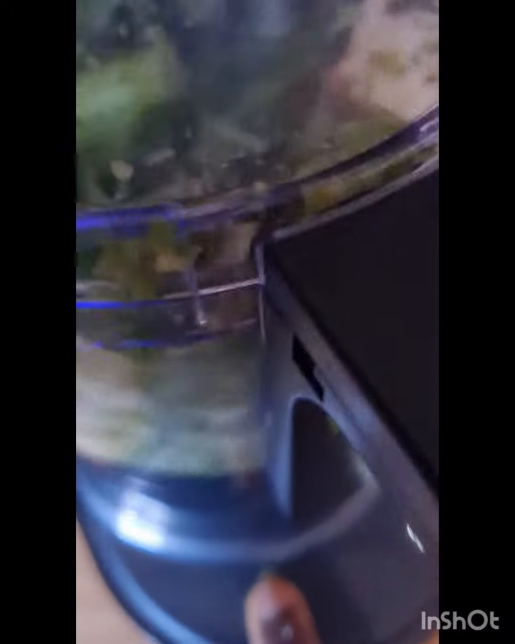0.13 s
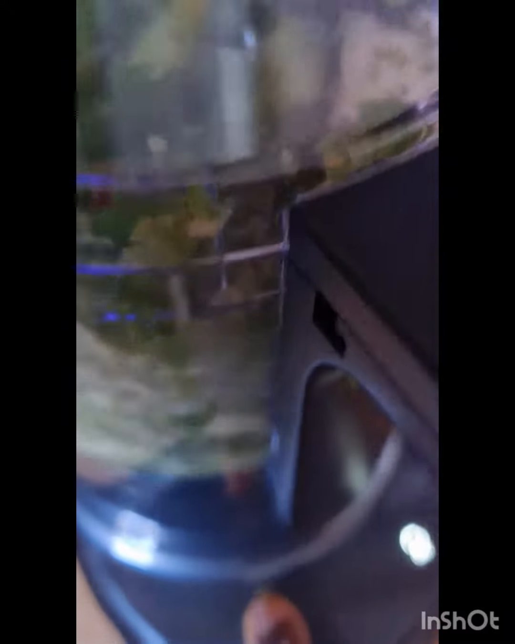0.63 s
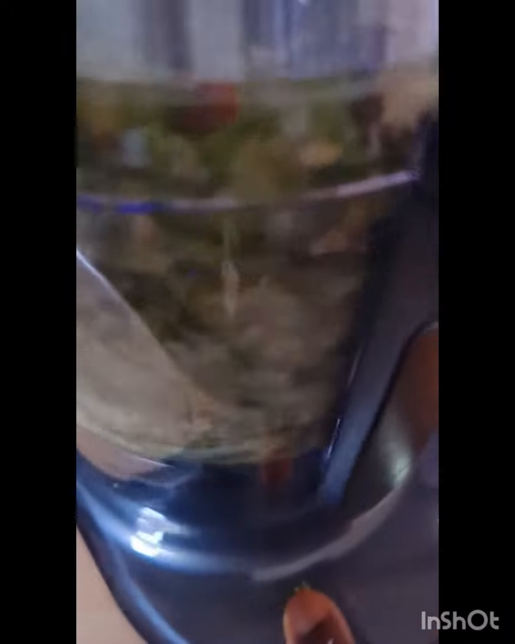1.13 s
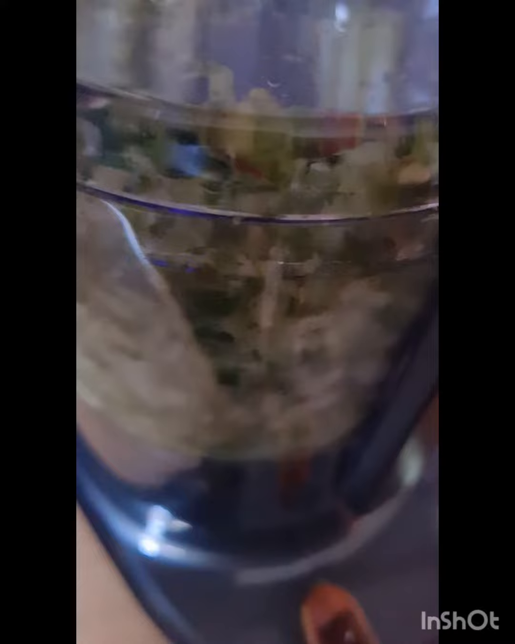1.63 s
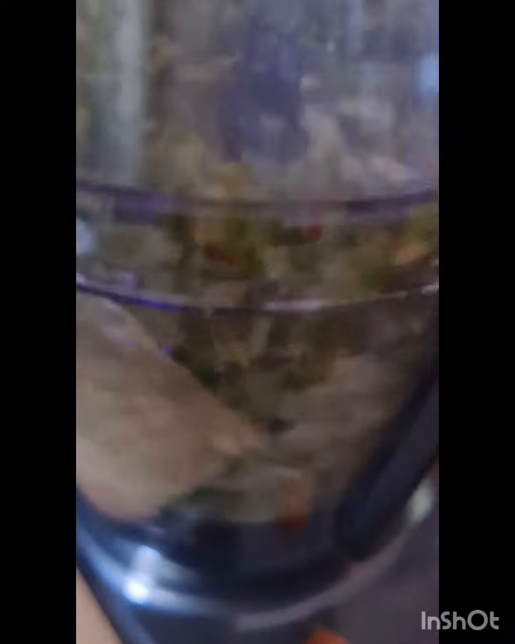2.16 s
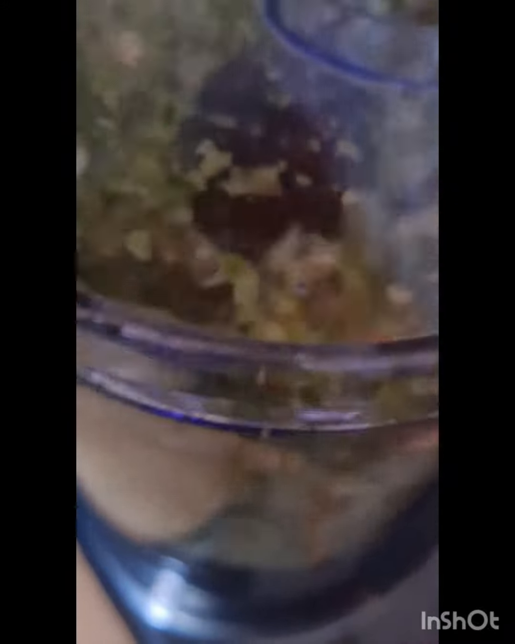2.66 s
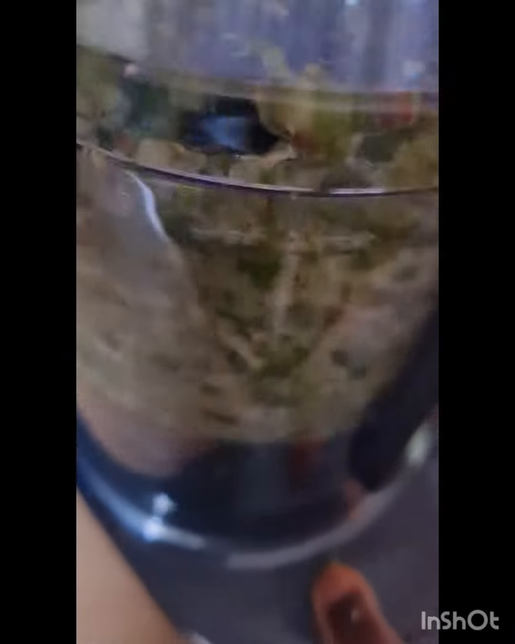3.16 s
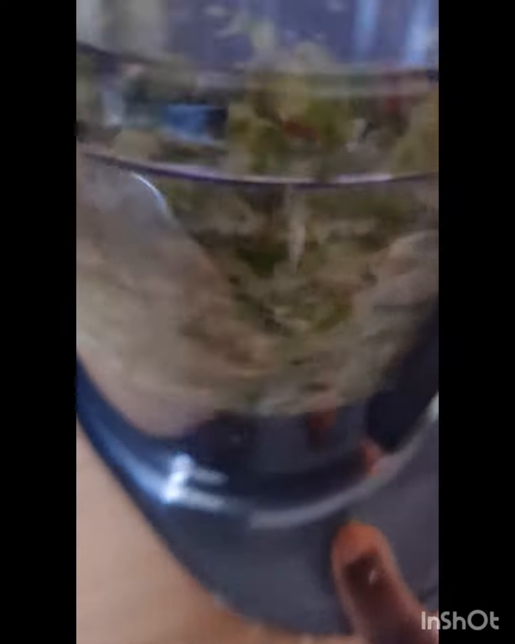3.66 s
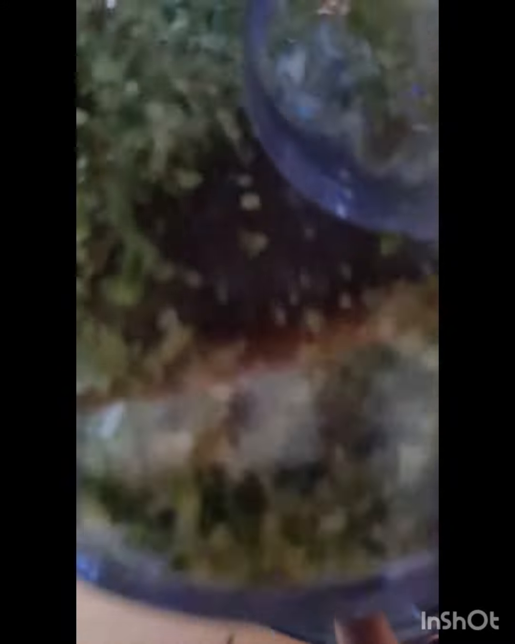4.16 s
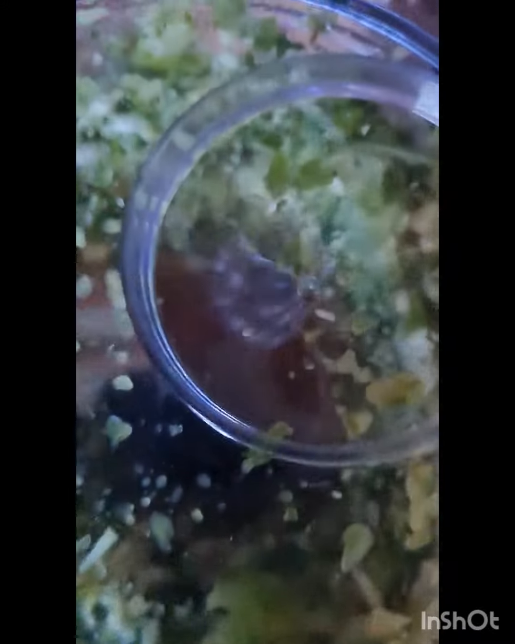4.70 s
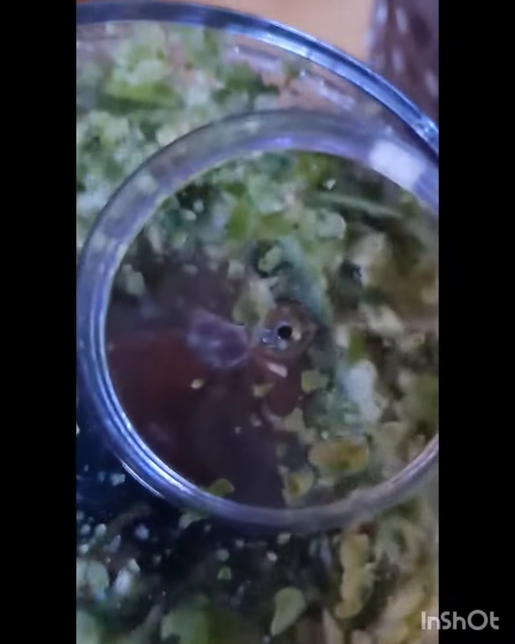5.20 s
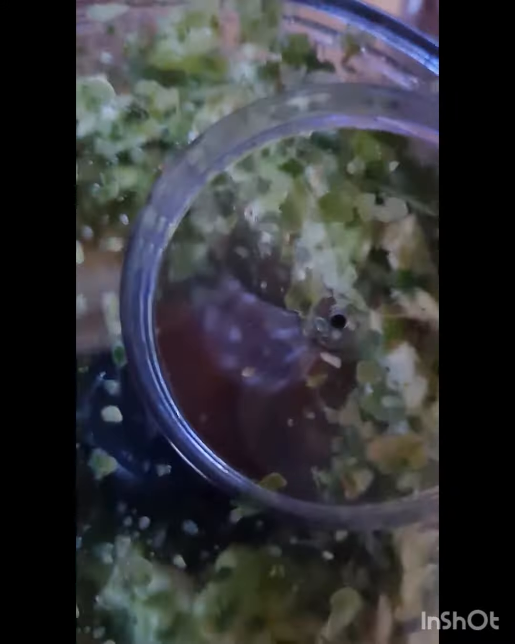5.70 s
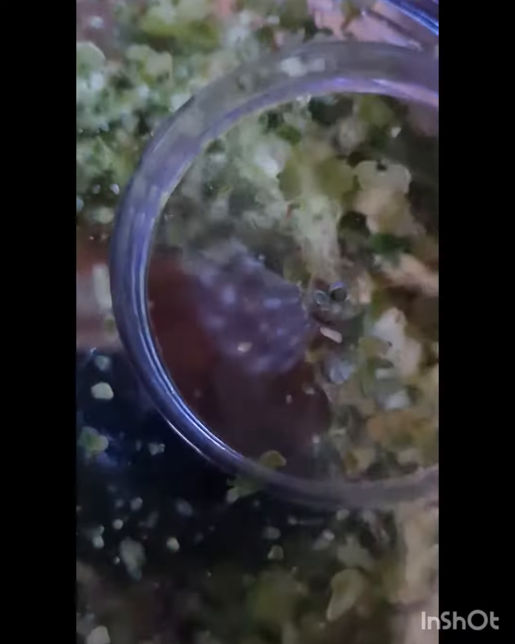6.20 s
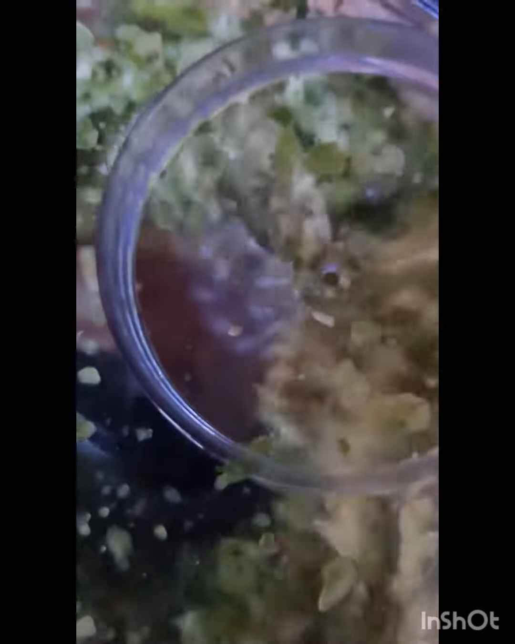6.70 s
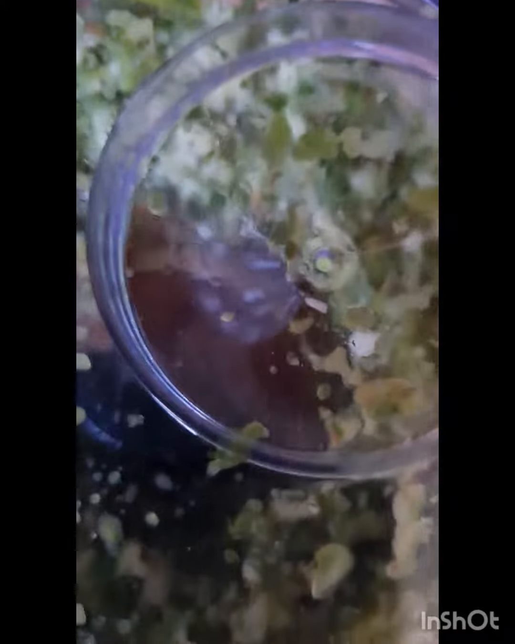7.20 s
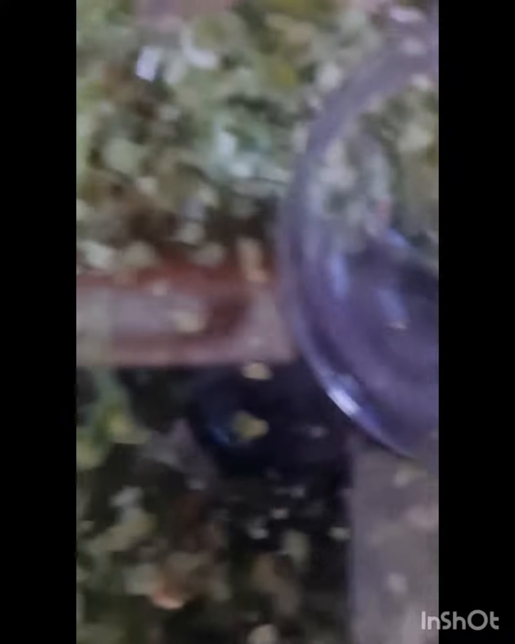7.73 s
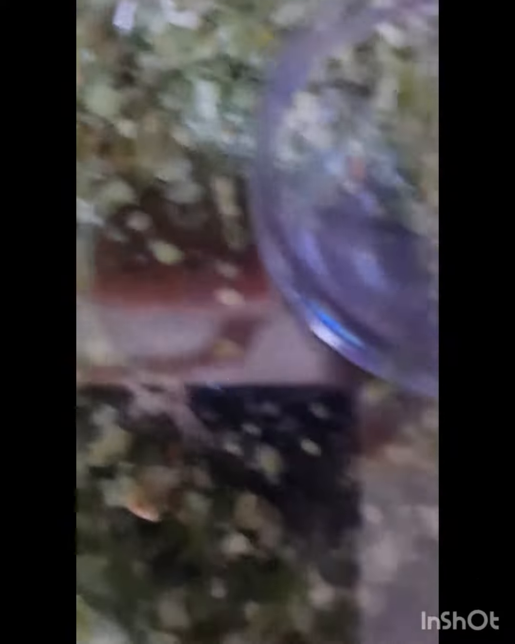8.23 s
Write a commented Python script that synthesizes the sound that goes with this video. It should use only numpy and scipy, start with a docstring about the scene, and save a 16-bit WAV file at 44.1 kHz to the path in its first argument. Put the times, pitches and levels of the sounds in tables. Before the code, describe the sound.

A food processor grinds wet vegetables very close by, with a piercing gliding whine over a dense, rough roar of air, rattle and blade chops. The pitch sags and recovers with the load, climbing higher later. The hand-held phone moves from beside the base to above the lid. The motor is switched off, drops quickly in pitch and stops, leaving a quiet kitchen with low fridge hum and tiny ticks.

```python
"""A food processor whines and roars as it grinds wet vegetables in a plastic bowl, then stops in a quiet kitchen.
Tooth, octave and fan tones follow a shaft speed that sags and recovers with the load.
Fan air, blade bites and a once-a-turn rattle ring the housing, throbbing at twice the mains frequency.
Hum, thuds and rumble swell below. The phone moves from beside the base to above the lid.
After switch-off the shaft spins down, leaving fridge hum, hiss, a bowl ring and two ticks."""
import sys
import numpy as np
from scipy import signal
from scipy.fft import rfft, irfft, next_fast_len
from scipy.io import wavfile
from scipy.ndimage import uniform_filter1d, map_coordinates

SR = 44100
rng = np.random.default_rng(int(sys.argv[2]) if len(sys.argv) > 2 else 0)


def waveform_to_disk(signal):
    """Save audio, clipped to [-1, 1], as 16-bit WAV at the path in sys.argv[1]."""
    frames = np.transpose(np.atleast_2d(signal))
    scaled = np.clip(frames, -1, 1) * 32767
    samples = np.round(scaled).astype(np.int16)
    wavfile.write(sys.argv[1], SR, samples)


def ratio_of_db(decibels):
    """Turn decibels (scalar or array-like) into linear amplitude factors; 0 dB maps to 1."""
    return 10 ** (np.asarray(decibels, float) / 20)


N = 368235
T = np.arange(N) / SR
SIZE = next_fast_len(N + SR)
HZ = np.maximum(np.fft.rfftfreq(SIZE, 1 / SR), 1)
SIDE = np.array([[.5], [-.5]])  # left, right share of a level difference in dB
TORQUE_HZ, RUMBLE_HZ = 100, 48.3
SWITCH_OFF_S = 6.93

# hand-held phone: time_s, height (0 beside the base - 1 above the lid)
PHONE_HEIGHT = [(0, 0.33), (2.4, 0.21), (3.5, 0.15), (4.4, 0.89), (8.35, 0.71)]


def processor():
    """Motor, bowl and housing driven by one shaft, heard from a moving place."""
    height, = curves(PHONE_HEIGHT)
    place = np.clip((height - .25) / .6, 0, 1)
    speed, coast = shaft_speed()
    turns, throb = torque_ripple(speed)
    pan_db = -6.5 + 0.54 * walk(4.9)
    tones = whine(speed, turns, coast, throb, pan_db, place)
    body = housing_roar(turns, coast, throb, pan_db, height, place)
    return tones + body + hum(coast, place) + rumble(coast, place) + thuds(coast, place)


# shaft, slowed by chunks under the blade, recovering, then coasting down: time_s, speed_turns_per_s
SHAFT_SPEED = [(0, 95), (0.12, 95), (0.28, 93.2), (0.4, 97.4), (0.62, 99.8), (0.7, 99.1), (0.8, 100.3),
               (0.9, 97.3), (1.0, 99.5), (1.18, 101), (1.32, 104.8), (1.58, 96.2), (1.7, 96.4), (1.8, 95.8),
               (1.92, 99.8), (2.1, 101.7), (2.24, 98.4), (2.64, 112.4), (2.75, 111), (2.9, 103.9),
               (3.0, 101.5), (3.12, 95), (3.22, 95.4), (3.4, 101.4), (3.6, 109.8), (3.75, 111.6),
               (4.04, 117.6), (4.14, 114.8), (4.27, 108), (4.4, 102.6), (4.53, 99.8), (4.72, 105.4),
               (4.94, 116), (5.1, 117.5), (5.2, 120.8), (5.32, 129.3), (5.42, 129.8), (5.6, 114.9),
               (5.81, 101.8), (6.0, 109), (6.35, 120.8), (6.55, 129), (6.66, 131), (6.72, 130.6),
               (6.78, 127), (6.85, 115.5), (6.88, 111.5), (6.93, 109.5), (6.96, 99.5), (7.0, 80),
               (7.045, 64), (7.085, 50), (7.2, 28), (7.26, 14), (7.29, 4.5), (7.34, 1.5), (7.41, .1)]


def shaft_speed():
    """Shaft speed smoothed by inertia, and log10 of its shortfall below the coasting speed."""
    inertia_s, coast_turns_per_s = .03, 97.6
    speed = uniform_filter1d(curves(SHAFT_SPEED)[0], int(inertia_s * SR))
    return speed, np.log10(np.minimum(speed / coast_turns_per_s, 1))


def torque_ripple(speed):
    """Torque peaks twice per mains cycle: the shaft runs ahead and behind, the sound throbs."""
    ripple_turns, peakedness = .0025, 1.3
    powered = T < SWITCH_OFF_S
    # load jerks blur the high partials most
    turns = np.cumsum(speed * (1 + .002 * walk(30))) / SR
    swing = np.sin(2 * np.pi * TORQUE_HZ * T + .5 * walk(3.04))
    turns += ripple_turns * swing * powered
    throb = np.exp(peakedness * swing)
    throb = unit(throb - throb.mean()) * np.sqrt(.5) * powered
    return turns, throb


# what the housing lets out as each tone glides, relative levels: pitch_hz, beside_db, above_db
TOOTH_LEVEL = [(1001, -50, -36), (1700, -40, -25), (1900, -38, -24), (2100, -26, -30), (2150, -19.5, -29),
               (2204, -16.5, -30.5), (2266, -23.5, -28), (2340, -24, -27), (2358, -30, -25),
               (2440, -34.5, -20), (2462, -26, -21), (2490, -40, -22.5), (2695, -36.5, -32),
               (2860, -40.5, -27.5), (2904, -43, -34.5), (3070, -40, -30)]
OCTAVE_LEVEL = [(900, -52, -46), (1500, -40, -30), (2100, -30, -24), (2910, -30, -25), (3500, -36.5, -35.5),
                (4000, -37, -25.5), (4365, -36.5, -40), (4393, -25.5, -35.5), (4550, -26, -34),
                (4504, -19, -35), (4500, -23.5, -30.5), (4900, -28, -33.5), (4880, -26, -32),
                (5170, -37, -38), (5400, -57, -31.5), (5780, -45, -41), (5980, -50.5, -48.5)]
FAN_LEVEL = [(1000, -52, -52), (1600, -42, -37.5), (2440, -36, -36), (2520, -29, -31.5),
             (2640, -34.5, -25.5), (2660, -33, -28.5), (2700, -36, -33), (2850, -34.5, -33.5),
             (2910, -35, -34.5), (3200, -37, -33.5), (3430, -41.5, -36.5)]
# left minus right of the tooth tone: pitch_hz, beside_db, above_db
TOOTH_LEAN = [(2120, -1, 6), (2160, -4, 1.5), (2280, -6, -12), (2340, -7.5, -18), (2380, 0, -13),
              (2520, -1, -11.5), (2650, -6.5, -15.5), (2705, -6.5, -6.5), (2920, 1, -8.5), (2950, 1, -20.5)]
# swells and dips: time_s, change_db, half_length_s
TOOTH_BUMPS = [(0.1, -5, .1), (0.28, 2, 0.06), (0.5, -13, 0.09), (0.75, -2, 0.21), (0.95, -3.5, 0.087),
               (1.1, -3.5, 0.078), (1.28, -2.5, 0.086), (1.76, 2, 0.15), (2.65, 5, 0.21), (3.1, -2.5, .05),
               (3.2, 4, 0.14), (3.72, 7, 0.18), (4.02, -5.5, .07), (4.21, 5.5, 0.072), (4.45, -4, .1),
               (4.8, 1, .06), (5.05, -2, 0.1), (5.27, -14.5, 0.1), (5.46, 0, 0.06), (5.59, -5.5, 0.043),
               (5.69, 5.5, 0.065), (6.15, 1.5, .1), (6.41, 7, 0.1), (6.58, -2.5, 0.044), (6.68, 5.5, .05),
               (6.8, 7.5, 0.05), (6.96, 5, 0.043)]
OCTAVE_BUMPS = [(0.15, -6.5, 0.29), (0.43, 5.5, 0.034), (1.08, 0.5, 0.07), (2.27, -3.5, 0.084),
                (2.52, 2, 0.067), (3.75, 1.5, .25), (4.42, 2, .06), (4.55, 5.5, .06), (4.68, -2, .06),
                (5.05, -2.5, .12), (5.7, 0, 0.089), (6.82, 3, 0.035), (7.0, 3.5, .03)]


def whine(speed, turns, coast, throb, pan_db, place):
    """Gear-tooth tone, its octave and a fan tone glide with the shaft through housing, lid and walls."""
    teeth, blades = 23, 13
    load_db = braking_swell(speed)

    def level_db(table, order):
        released_db = at_pitch(table, order * speed, place)
        return released_db + 32.5 * coast + load_db + 1.2 * walk(10)

    def pair(order, waver_db, jitter_rad):
        return np.array([tone(order * turns, waver_db, jitter_rad, 60) for _ in SIDE])

    tooth_pan_db = at_pitch(TOOTH_LEAN, teeth * speed, place)
    tooth_db = level_db(TOOTH_LEVEL, teeth) + bumps(TOOTH_BUMPS) + SIDE * tooth_pan_db
    # the octave takes the load swell twice
    octave_db = level_db(OCTAVE_LEVEL, 2 * teeth) + load_db + bumps(OCTAVE_BUMPS) + SIDE * pan_db
    fan_db = level_db(FAN_LEVEL, 2 * blades) + SIDE * pan_db
    tones = ratio_of_db(tooth_db) * pair(teeth, 1.1, 0.42)
    tones += ratio_of_db(octave_db) * pair(2 * teeth, 2.0, 1.25)
    tones += ratio_of_db(fan_db) * pair(2 * blades, 1.96, 1.0)
    tones *= 1 + np.interp(place, [0, 1], (.1, .34)) * throb
    return ratio_of_db(-2.0) * lid_and_walls(tones)


def braking_swell(speed):
    """Tones swell in dB while a load brakes the shaft and thin out while it runs free."""
    full_load_db, full_load_turns_per_s2 = 2, 94
    braking = -uniform_filter1d(np.gradient(speed) * SR, SR // 10)
    return full_load_db * np.tanh(braking / full_load_turns_per_s2) * (T < SWITCH_OFF_S)


def lid_and_walls(tones):
    """The lid rings with the tones; wall echoes smear each glide and favour some pitches."""
    lid_hz, lid_width_hz, lid_db = 2903, 64, 6.5
    echo_db, echo_t60_s = -14, .2
    lid = ratio_of_db(lid_db * narrow(lid_hz, lid_width_hz) ** 2)
    walls = 1 + ratio_of_db(echo_db) * echoes(echo_t60_s)
    return irfft(rfft(tones, SIZE) * lid * walls, SIZE)[:, :N]


def housing_roar(turns, coast, throb, pan_db, height, place):
    """Roar gated by bites and throb; as the motor slows it fades and loses its treble first."""
    level_db = -17.5 - 0.68 * walk(8) + 27 * coast
    body = ratio_of_db(level_db + SIDE * (pan_db + 3.0)) * bites() * roar(turns, coast, height, place)
    dull = irfft(rfft(body, SIZE) / np.sqrt(1 + (HZ / 1500) ** 2), SIZE)[:, :N]
    body += (dull - body) * np.clip(-.9 * coast, 0, 1)
    return body * (1 + .14 * throb)


# weaker shaft partials, relative to the fan air: order (multiple of shaft rate), beside_db, above_db
SHAFT_ORDERS = [(12.99, -23.5, -17.5), (13.9, -21, -21.5), (16.9, -30, -31), (27.9, -20.5, -31),
                (32.8, -31.5, -28), (36.1, -33.5, -21.5), (38.2, -37, -24), (38.9, -30, -14),
                (52.2, -26, -15), (65, -27.5, -19), (68.6, -16, -26), (92.7, -9, -9), (114, -16, -21),
                (141, -9.5, -13)]
# relative colour of the roar, each place: pitch_hz, density_db_per_hz
COLOUR_BESIDE = [(35, -40.5), (60, -16.5), (102, -5), (171, -8.5), (413, -7), (1000, -18), (1290, 1),
                 (1710, -6), (2160, 4), (3350, -12.5), (4750, -9.5), (7390, -15), (8700, -27.5),
                 (11200, -27.5), (15600, -39.5)]
COLOUR_ABOVE = [(35, -25), (60, -9.5), (102, -6), (183, -14.5), (404, -12), (775, -3), (1000, -13.5),
                (1180, -1.5), (1920, -3), (2850, 1), (3280, -6), (4860, -9.5), (7390, -14.5), (8700, -23),
                (15600, -29.5)]
# housing and bowl resonances, over the colour: pitch_hz, width_hz, beside_db, above_db
RESONANCES = [(390, 170, 6.5, 7), (1131, 210, 7.5, 3.5), (1230, 57, 0, -1), (1760, 60, -11, 8),
              (1854, 370, 6.5, -0.5), (2286, 37.7, -7, 3.5), (2440, 130, -3, 6.5), (2877, 110, 3.5, 6),
              (3634, 180, 4.5, 7), (3945, 210, 8, 3.5), (4687, 210, 11.5, 1), (4930, 92, 5, 5),
              (5430, 120, -5.5, 9), (6650, 67, 9.5, -8), (7540, 99, 5.5, 4.5)]
# slow drift of the roar's bass: time_s, bass_db
BASS_DRIFT = [(0, 1.5), (1.2, -1), (2.4, 0), (3.9, -0.5), (4.6, 0.2), (6, 0.2), (8.35, -2)]


def roar(turns, coast, height, place):
    """Fan air, rattle and shaft partials ring the housing; colour and echoes change with the place."""
    still_s, bass_hz, rattle_db = .42, 650, -11
    sound = noise() * ratio_of_db(1.0 * walk(25)) + ratio_of_db(rattle_db) * rattle(turns)
    for order, beside_db, above_db in SHAFT_ORDERS:
        partial_db = beside_db + place * (above_db - beside_db) + 5 * coast
        sound += ratio_of_db(partial_db) * tone(order * turns, 1.1, 0.98, 25 + .8 * order)
    times, out = np.arange(0, 7.8, still_s), 0
    bass_db = np.interp(times, *np.transpose(BASS_DRIFT))
    for k, h in enumerate(np.interp(times, T, height)):
        colour_db = (1 - h) * over_hz(COLOUR_BESIDE) + h * over_hz(COLOUR_ABOVE)
        for hz, width_hz, beside_db, above_db in RESONANCES:
            colour_db += ((1 - h) * beside_db + h * above_db) * narrow(hz, width_hz) ** 2
        colour_db += bass_db[k] / (1 + (HZ / bass_hz) ** 4)
        # equal-power crossfade between places
        fade = np.sqrt(np.interp(T, times, np.eye(len(times))[k]))
        out = out + fade * ratio_of_db(-1.5 * h) * ports(sound, ratio_of_db(colour_db))
    return out


def rattle(turns, renew_turns=3.):
    """Knocks that come back at the same angle every turn and renew themselves over some turns."""
    rows = turns / renew_turns
    pattern = rng.standard_normal((int(rows[-1]) + 2, 256))
    return unit(map_coordinates(pattern, [rows, turns % 1 * 256], order=1, mode="grid-wrap"))


def bites():
    """Gain of the roar: short bursts of random size as the blade bites chunks at random."""
    bites_per_s, mean_gain, decay_s = 160, .17, .002
    hits = (rng.random(N) < bites_per_s / SR) * rng.exponential(mean_gain, N)
    return unit(1 + signal.lfilter([1], [1, -np.exp(-1 / (decay_s * SR))], hits))


# swells over the steady hum: time_s, change_db, half_length_s
HUM_BUMPS = [(0.12, 10.7, 0.2), (0.5, 5.5, 0.13), (2.3, 9, .1), (4.45, 7.5, .3), (5.58, 7.5, 0.13),
             (5.93, 5.3, 0.12), (6.81, 7.9, .06)]


def hum(coast, place):
    """Motor hum: a sine at twice the mains frequency over a narrow noise band."""
    level_db = swelling((-38, -38), HUM_BUMPS, 1, place) + 32.4 * coast
    sine = np.sin(2 * np.pi * TORQUE_HZ * T) * np.array([[1.1], [1.4]])
    return ratio_of_db(level_db) * (sine + 0.55 * ports(noise(), narrow(85, 30) ** 2))


# swells over the steady rumble: time_s, change_db, half_length_s
RUMBLE_BUMPS = [(3.07, 9.9, .15), (5.23, 8, .06), (5.49, 14, .08), (5.73, 14, .08), (6.18, 12, .05),
                (6.7, 20.5, .11), (6.99, 11, .08)]


def rumble(coast, place):
    """Rumble driven into the worktop: a low sine and a noise band around it."""
    level_db = swelling((-51, -48.5), RUMBLE_BUMPS, 1.5, place) + 16.2 * coast
    sine = np.sin(2 * np.pi * RUMBLE_HZ * T)
    return ratio_of_db(level_db) * (sine + .5 * ports(noise(), narrow(RUMBLE_HZ, 9) ** 2))


# swells over the steady thud band: time_s, change_db, half_length_s
THUD_BUMPS = [(0.15, 7.7, 0.2), (0.76, 6.9, 0.18), (1.11, 15.7, 0.13), (2.32, 7.9, 0.12),
              (4.83, 8.1, 0.039), (5.531, 9.6, .06), (5.92, 10, 0.13), (6.29, 12, 0.065), (6.64, 9.6, .05),
              (6.81, 8.7, 0.078)]


def thuds(coast, place):
    """Thuds in the bowl: a resonant noise band that swells."""
    level_db = swelling((-40.5, -45), THUD_BUMPS, 1.5, place) + 28.35 * coast
    return ratio_of_db(level_db) * ports(noise(), narrow(261.3, 150) ** 2)


# chunks hit the bowl wall: start_s, level_db, pitch_hz, t60_s
WALL_KNOCKS = [(3.66, -19, 1500, .09)]


def knocks():
    """Short dull bursts of resonant noise from the bowl wall."""
    out = 0
    for start_s, level_db, hz, t60_s in WALL_KNOCKS:
        decay = (T > start_s) * 1000. ** (-np.maximum(T - start_s, 0) / t60_s)
        out = out + ratio_of_db(level_db) * decay * ports(noise(), narrow(hz, 700) ** 2)
    return out


def kitchen():
    """Quiet kitchen, leaning left, from fridge to ticks."""
    pan_db = 3.5
    return ratio_of_db(pan_db * SIDE) * (fridge_and_hiss() + room_tone() + bowl_ring() + ticks())


# relative levels: time_s, fridge_hum_db, hiss_db
KITCHEN_LEVELS = [(7.3, -67.5, -86.5), (7.6, -62, -91.5), (7.8, -66, -94), (7.95, -63.5, -85.5),
                  (8.1, -64.5, -74), (8.35, -63, -70)]


def fridge_and_hiss():
    """Fridge hum, a low sine with a noise band, and a faint distant hiss band."""
    hum_db, hiss_db = curves(KITCHEN_LEVELS)
    sine = 1.35 * np.sin(2 * np.pi * RUMBLE_HZ * T)
    fridge = ratio_of_db(hum_db) * (sine + .3 * ports(noise(), narrow(RUMBLE_HZ, 12) ** 2))
    return fridge + ratio_of_db(hiss_db) * ports(noise(), narrow(1500, 900) ** 4)


# relative colour of the room: pitch_hz, density_db_per_hz
ROOM_COLOUR = [(55, -23.5), (75, -1.5), (110, -1.5), (169, -11), (245, -11.5), (427, -21.5), (484, -20),
               (792, -18.5), (1660, -7.5), (2460, -29.5), (15000, -37.5)]


def room_tone():
    """Steady coloured noise."""
    return ratio_of_db(-73) * ports(noise(), ratio_of_db(over_hz(ROOM_COLOUR)))


# steady until the decay starts: decay_start_s, pitch_hz, level_db, t60_s
BOWL_RING = (7.5, 280, -81, 2)


def bowl_ring():
    """The bowl rings on after the stop: a wavering tone that dies away."""
    start_s, hz, level_db, t60_s = BOWL_RING
    decay = 1000. ** (-np.maximum(T - start_s, 0) / t60_s)
    return ratio_of_db(level_db) * tone(hz * T, 5.0, 1.2, 27) * decay


# start_s, level_db, pitch_hz, t60_s
SMALL_TICKS = [(7.56, -63, 1100, .05), (8.24, -65, 7300, .04)]


def ticks():
    """Small ticks: short decaying sines."""
    out = 0
    for start_s, level_db, hz, t60_s in SMALL_TICKS:
        age_s = np.maximum(T - start_s, 0)
        out = out + ratio_of_db(level_db) * np.sin(2 * np.pi * hz * age_s) * 1000. ** (-age_s / t60_s)
    return out


# share common to both ports: pitch_hz, share (0-1)
COMMON_SHARE = [(60, 0.75), (300, 0.58), (640, 0.5), (1200, 0.02), (15000, 0)]
# left minus right: pitch_hz, balance_db
PORT_LEAN = [(60, -5.5), (110, -2.5), (200, 4), (380, 5.5), (700, -5), (1290, 2.5), (2380, 1), (4400, 1.5),
             (8120, 4.5), (15000, -6.5)]


def ports(sound, gain):
    """One sound at two ports, rms 1: bass alike, treble by separate echoes and parts of its own."""
    spread, echo_t60_s = 0.49, 0.098  # spread: share of the treble unique to each port
    share = over_hz(COMMON_SHARE)
    echoed = np.sqrt((1 - share) * (1 - spread)) * echoes(echo_t60_s)
    heard = (np.sqrt(share) + echoed) * rfft(sound, SIZE)
    heard += np.sqrt((1 - share) * spread) * rfft(rng.standard_normal((2, N)), SIZE)
    lean = ratio_of_db(over_hz(PORT_LEAN) * SIDE)
    return unit(irfft(gain * lean * heard, SIZE)[:, :N])


def echoes(t60_s):
    """Two unrelated dying echo trains of unit energy, one for each port, as spectra."""
    trains = rng.standard_normal((2, SR // 2)) * 1000. ** (-T[:SR // 2] / t60_s)
    return rfft(trains, SIZE) / np.linalg.norm(trains, axis=1, keepdims=True)


def narrow(hz, width_hz):
    """Gain of a resonance, 1 at its centre."""
    return 1 / np.sqrt(1 + ((HZ - hz ** 2 / HZ) / width_hz) ** 2)


def tone(cycles, waver_db, jitter_rad, rate_hz):
    """A partial of rms near 1 whose size and phase wander."""
    phase = 2 * np.pi * cycles + jitter_rad * walk(rate_hz)
    return np.sqrt(2) * ratio_of_db(waver_db * walk(rate_hz)) * np.sin(phase)


def swelling(steady_db, swells, wander_db, place):
    """A level in dB that depends on the place, wanders and swells at given moments."""
    beside_db, above_db = steady_db
    return beside_db + place * (above_db - beside_db) + wander_db * walk(11) + bumps(swells)


def bumps(swells):
    """Bell-shaped swells in dB."""
    return sum(db * np.exp(-((T - s) / half_s) ** 2) for s, db, half_s in swells)


def at_pitch(table, hz, place):
    """A (pitch, beside, above) table read at a moving pitch from a moving place."""
    at_hz, beside, above = np.transpose(table)
    return (1 - place) * np.interp(hz, at_hz, beside) + place * np.interp(hz, at_hz, above)


def curves(table):
    """Columns of a timed table at every sample."""
    s, *columns = np.transpose(table)
    return [np.interp(T, s, column) for column in columns]


def over_hz(table):
    """A (pitch, value) table at every frequency bin, on a log pitch axis."""
    hz, value = np.transpose(table)
    return np.interp(np.log(HZ), np.log(hz), value)


def walk(rate_hz):
    """Random levels held 1 / rate_hz, smoothed twice, cut to length, then scaled to rms 1."""
    k = int(SR / rate_hz)
    held = np.repeat(rng.standard_normal(N // k + 1), k)
    return unit(uniform_filter1d(uniform_filter1d(held, k), k)[:N])


def noise():
    """White noise."""
    return rng.standard_normal(N)


def unit(x):
    """Scale to rms 1."""
    return x / np.sqrt(np.mean(x ** 2))


def scene():
    """Machine and bowl knocks over the kitchen."""
    return processor() + knocks() + kitchen()


def low_pass(x):
    """Removes everything above the highest recorded frequency."""
    return signal.sosfilt(signal.butter(12, 15710, fs=SR, output="sos"), x)


def record(dry):
    """The phone rounds the loudest peaks."""
    rounded = np.tanh(dry)
    return low_pass(rounded)


dry = scene()
out = record(dry)
waveform_to_disk(out)
```